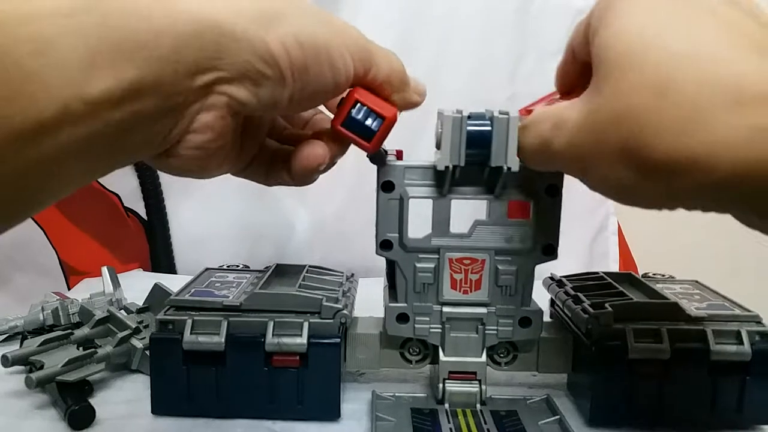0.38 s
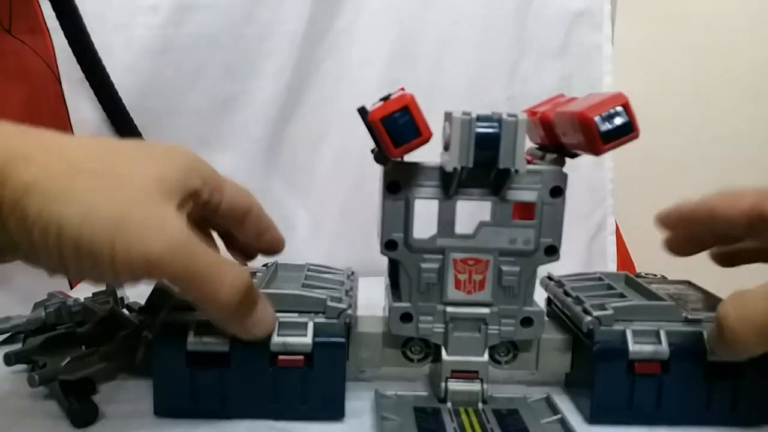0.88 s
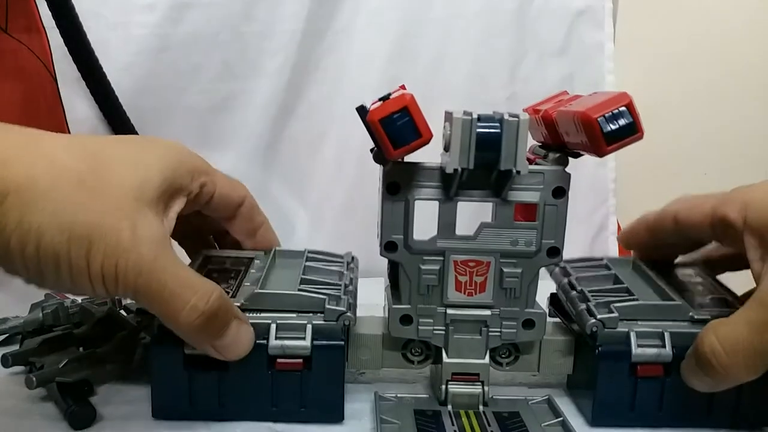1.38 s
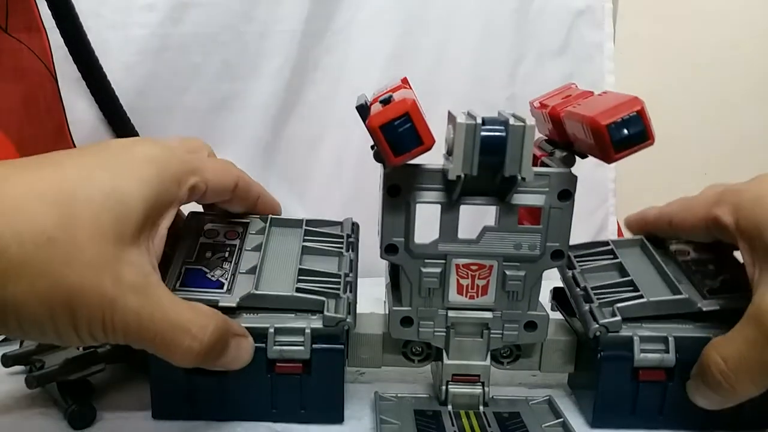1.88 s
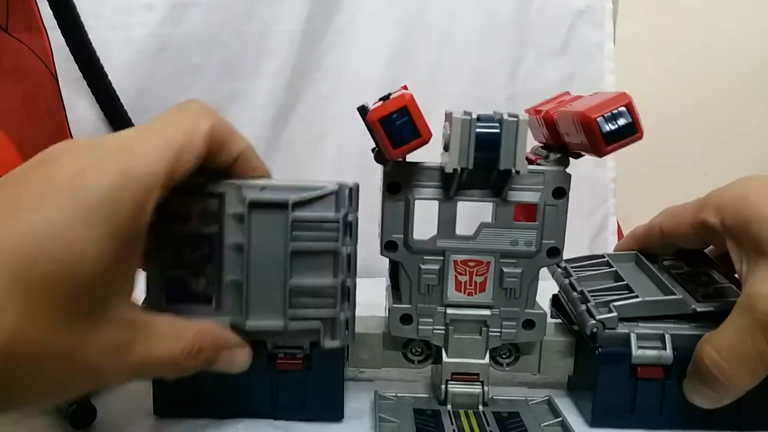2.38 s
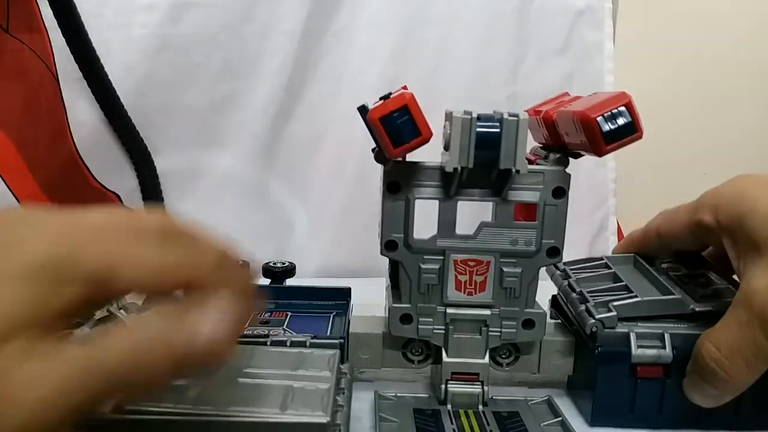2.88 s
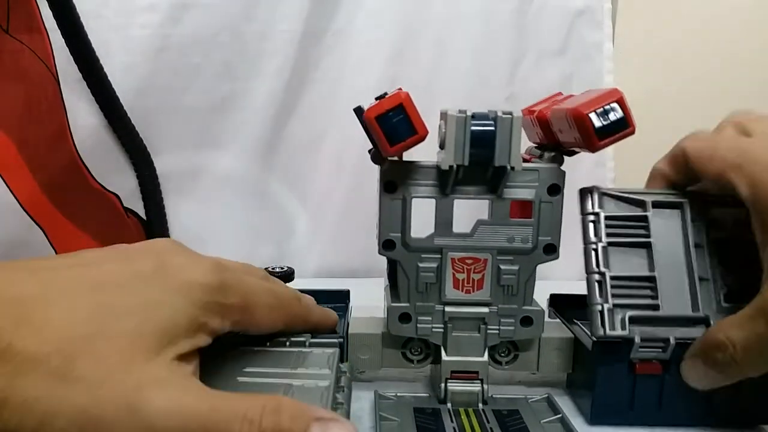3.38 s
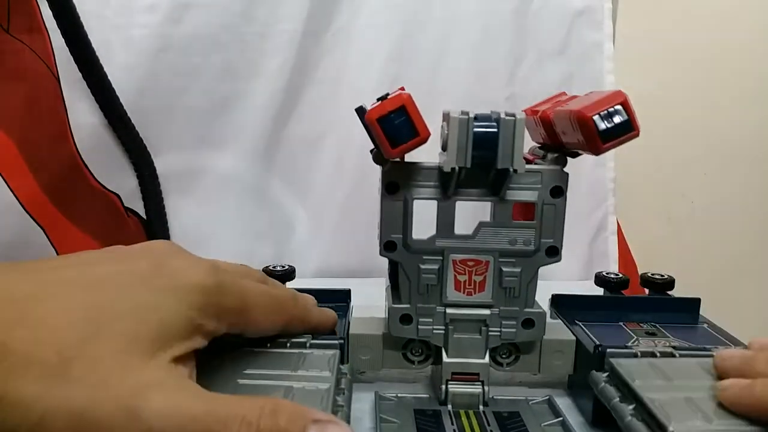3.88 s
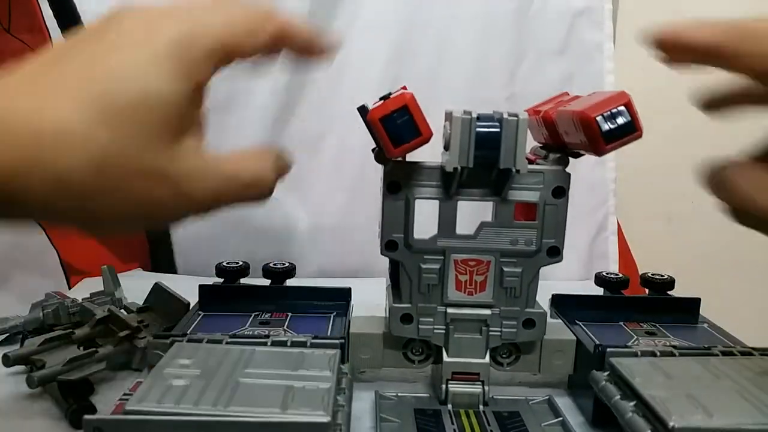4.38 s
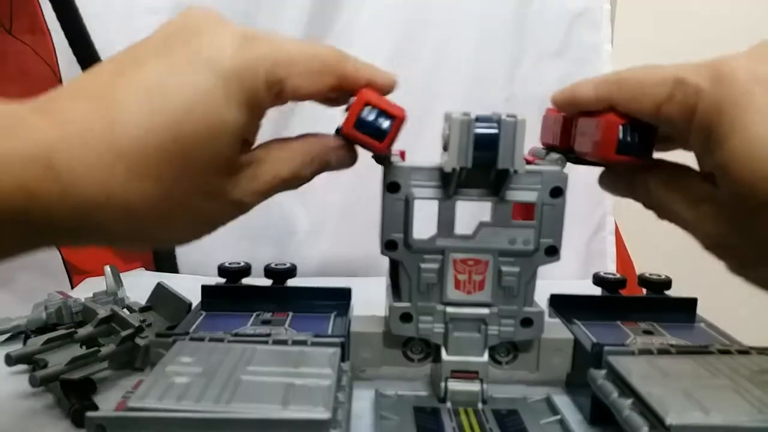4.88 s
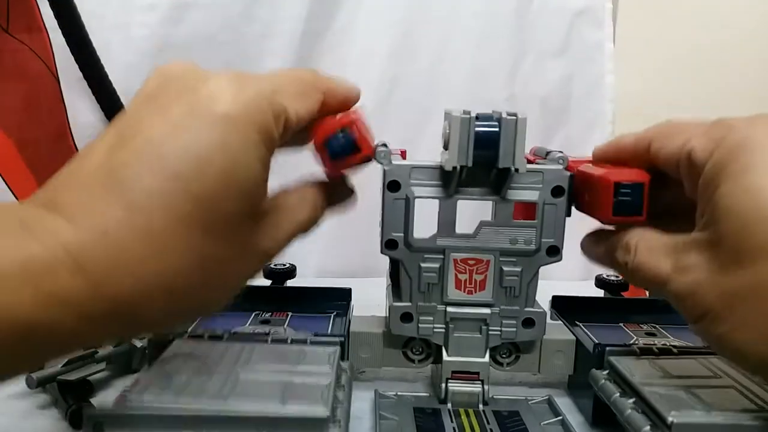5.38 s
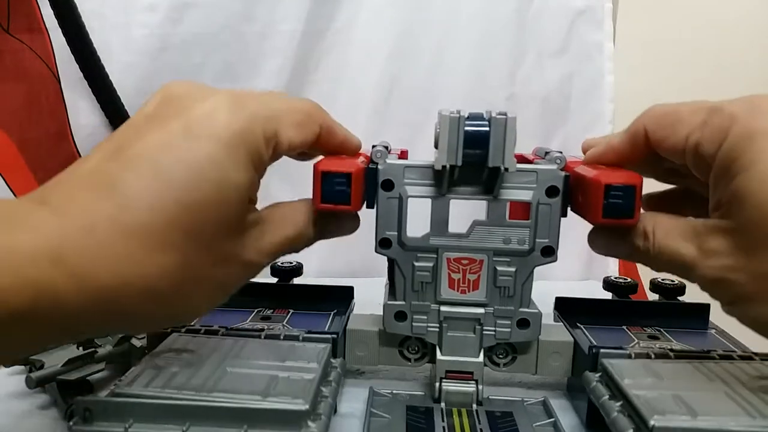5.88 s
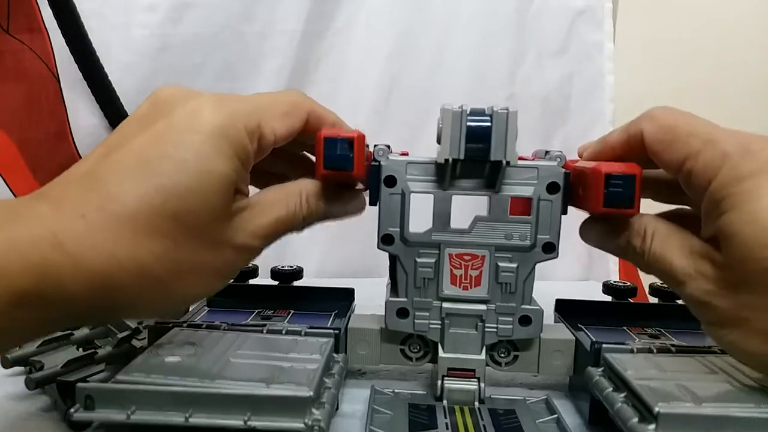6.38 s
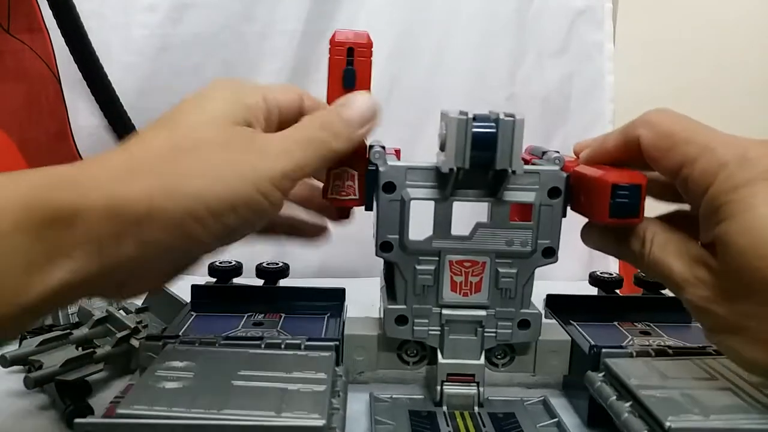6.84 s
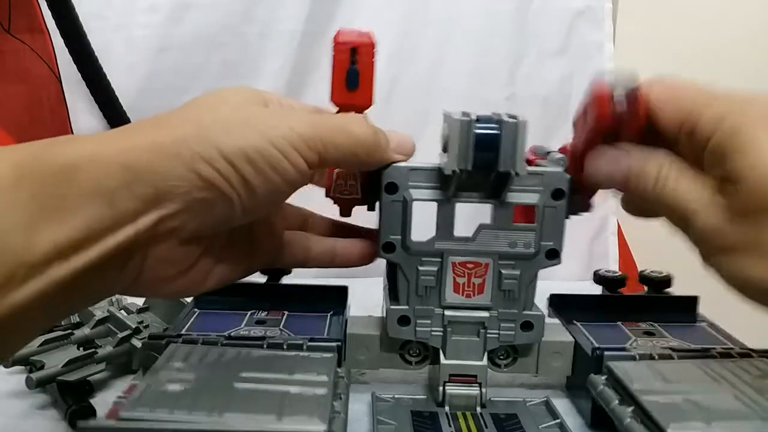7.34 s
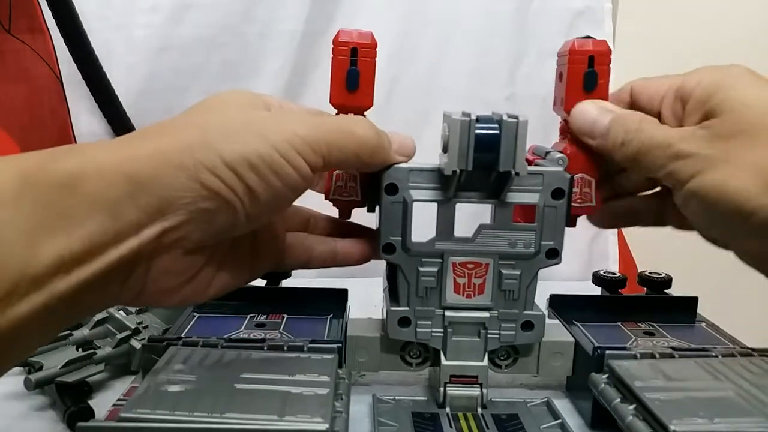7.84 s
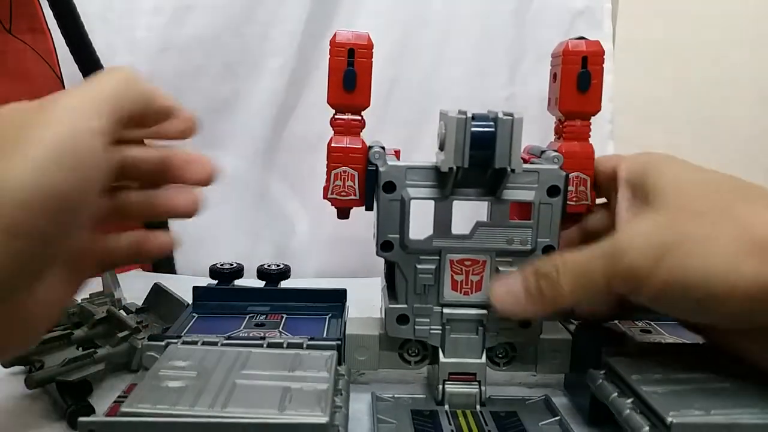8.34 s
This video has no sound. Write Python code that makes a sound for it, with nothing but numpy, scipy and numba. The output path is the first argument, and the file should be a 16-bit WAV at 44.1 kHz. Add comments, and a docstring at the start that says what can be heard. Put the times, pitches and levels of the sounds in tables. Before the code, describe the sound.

Irregular dry plastic clicks and rattles, a few strong clacks thumping the table, faint hand rustle, and a quick ratcheting joint at the end.

```python
"""A faint rustle of hands and a few light clicks come first, then hands fold a hard plastic toy on a table,
close to a phone in a quiet room: joints click, lids clack and rattle, a tight joint squeaks briefly.
A ratchet joint ticks at the end. Each contact is a short force that sets groups of ringing tones going.
The table thumps under the big blows: a soft push and a decaying low tone. Filtered noise makes the skin hiss
and the far town rumble; wavering low tones make the drones."""
import sys
import numpy as np
from scipy import signal
from scipy.fft import rfft, irfft
from scipy.io import wavfile
from scipy.ndimage import uniform_filter1d
from numba import njit

SR = 44100
rng = np.random.default_rng(int(sys.argv[2]) if len(sys.argv) > 2 else 0)


def file_out(sig):
    """Save sig as 16-bit WAV at sys.argv[1]."""
    # one column per channel
    cols = np.atleast_2d(sig).T
    # limit, then scale
    lim = np.clip(cols, -1, 1)
    pcm = np.round(lim * 32767).astype(np.int16)
    wavfile.write(sys.argv[1], SR, pcm)


def magnitude_from_level(level_db):
    """Linear magnitude for a level in decibels (20 dB per decade)."""
    exponent = np.asarray(level_db, float) / 20
    return 10 ** exponent


N = 373968
T = np.arange(N) / SR
CLUSTER = 3  # close tones that stand for each listed ringing tone


def set_rms(x, db):
    """Scale a sound to an rms level in dB."""
    return x * magnitude_from_level(db) / np.sqrt(np.mean(x ** 2))


def bandpass(x, order, band_hz):
    """Keep only the sound between two frequencies."""
    return signal.sosfilt(signal.butter(order, band_hz, "bandpass", fs=SR, output="sos"), x)


def coloured(points):
    """Noise with the given spectrum, rms 1."""
    hz, db = np.transpose(points)
    grid_hz = np.maximum(np.fft.rfftfreq(N, 1 / SR), 1)
    gain = magnitude_from_level(np.interp(np.log(grid_hz), np.log(hz), db))
    return set_rms(irfft(rfft(rng.standard_normal(N)) * gain, N), 0)


def walk(rate_hz):
    """Random levels, rate_hz of them a second, with smooth slides between; spread a little under 1."""
    hold = int(SR / rate_hz)
    steps = np.repeat(rng.standard_normal(N // hold + 1), hold)
    return uniform_filter1d(steps, hold)[:N]


def fades(start_s, db, decay_s):
    """An envelope that jumps at each event and dies away; a bare spike if the decay is zero."""
    spikes = np.zeros(N)
    places = np.minimum((np.asarray(start_s) * SR).astype(int), N - 1)
    np.add.at(spikes, places, magnitude_from_level(db))
    return signal.lfilter([1], [1, -np.exp(-1 / (max(decay_s, 1e-9) * SR))], spikes)


def grit(per_s, spread_db):
    """Sparse tiny impacts of very uneven size, rms 1."""
    hit = rng.random(N) < per_s / SR
    size = magnitude_from_level(spread_db * rng.exponential(size=N))
    return set_rms(hit * rng.standard_normal(N) * size, 0)


@njit
def resonate(force, poles, gains, struck):
    """A bank of ringing tones (modes) whose pitch and weight depend on the spot last struck."""
    out = np.zeros(len(force))
    for k in range(poles.shape[1]):
        z = 0j
        for i in range(len(force)):
            z = z * poles[struck[i], k] + gains[struck[i], k] * force[i] + 1e-18
            out[i] += z.imag
    return out


def ring(force, modes, struck, scatter_db, detune, band_hz, tilt_db=0, turns=0.21):
    """A force rings clusters of modes; grip and contact point retune and reweight them, in the part's own band."""
    hz, db, t60_s = np.repeat(np.transpose(modes), CLUSTER, axis=1)
    chance = rng.standard_normal((struck.max() + 1, 3, len(hz)))
    hz = np.minimum(hz * np.exp(detune * chance[:, 0]), .45 * SR)
    decay = np.log(1000) / np.maximum(t60_s, .002)
    poles = np.exp((2j * np.pi * hz - decay) / SR)
    gains = magnitude_from_level(db + tilt_db + scatter_db * chance[:, 1])
    gains /= np.sqrt(np.sum(gains ** 2, axis=1, keepdims=True) / 2)
    # neighbouring clusters swing in opposite senses
    sense = (-1) ** np.repeat(np.arange(len(modes)), CLUSTER)
    # each mode radiates from another part, so its phase strays
    phase = np.exp(2j * np.pi * turns * chance[:, 2])
    rung = resonate(force, poles, gains * sense * phase, struck)
    return bandpass(rung, 2, np.minimum(band_hz, .45 * SR))


# a far engine drone, one row per swell: start_s (its loudest moment), length_s (time to fall to 1/e),
# pitch_hz, level_db (rms at the loudest, before wavering)
SWELLS = [(0.45, 0.41, 80, -51.5), (1.2, 0.37, 78.7, -63), (2.294, 0.26, 78, -62), (3.3, .3, 71.5, -65.5),
          (4.446, 0.18, 71, -65), (5.6, 0.63, 75, -68.5), (6.398, 0.44, 79.7, -63.5),
          (7.491, 0.54, 80.7, -62.5), (8.3, 0.27, 80.2, -63)]


def swells():
    """The far engine drone: each swell rises and dies away on its own slightly wavering pitch."""
    wavering_time = np.cumsum(1 + 0.018 * walk(8)) / SR
    tone = 0
    for start_s, length_s, hz, db in SWELLS:
        swell = magnitude_from_level(db) * np.exp(-((T - start_s) / length_s) ** 2)
        tone = tone + swell * np.sin(2 * np.pi * hz * wavering_time)
    waver_db = 1.5 * walk(6)
    return np.sqrt(2) * magnitude_from_level(waver_db) * tone


def drone(rows):
    """A low tone that slides through the rows (start_s, pitch_hz, level_db) and wavers in pitch and level."""
    start_s, hz, db = np.transpose(rows)
    wavering_hz = np.interp(T, start_s, hz) * (1 + 0.0141 * walk(8))
    phase = 2 * np.pi * np.cumsum(wavering_hz) / SR
    waver_db = 1.5 * walk(6)
    return np.sqrt(2) * magnitude_from_level(np.interp(T, start_s, db) + waver_db) * np.sin(phase)


# colour of the room air and town rumble: pitch_hz, relative level_db (per Hz)
AIR_COLOUR = [(12, -45), (20, -13), (94, -5.5), (195, -3), (314, -7.5), (372, -6.5), (670, -14), (863, -15),
              (939, -14), (1020, -17.5), (1210, -18.5), (1320, -23), (4410, -43.5), (15200, -62),
              (16500, -47)]
# a second drone that rises and fades: start_s, pitch_hz, level_db (rms before wavering)
HIGH_DRONE = [(1.8, 130.6, -89), (2.2, 127.2, -71), (3.6, 143.3, -64.5), (4.5, 142.5, -63.5),
              (5.5, 146, -72.5), (6.0, 154, -84)]
# narrow wavering hums of appliances: pitch_hz, width_hz, level_db (rms)
APPLIANCES = [(359, 30, -66), (3170, 30, -80.5)]


def air():
    """Room air with town rumble as coloured noise, drones, and appliance hums as sharply filtered noise."""
    air_db, hum_hz, hum_db = -57, 53.6, -67
    hum = drone([(0, hum_hz, hum_db), (N / SR, hum_hz, hum_db)])
    for hz, width_hz, db in APPLIANCES:
        narrow = signal.iirpeak(hz, hz / width_hz, fs=SR)
        hum += set_rms(signal.lfilter(*narrow, rng.standard_normal(N)), db)
    return set_rms(coloured(AIR_COLOUR), air_db) + swells() + drone(HIGH_DRONE) + hum


# hands at work: start_s, movement level_db, skin sliding level_db (against the movement)
HANDS_MOVING = [(0.0, -60.5, -21), (0.47, -60, -19), (0.66, -72.5, -1), (0.99, -73.5, -6.5),
                (1.32, -70, -18), (1.58, -74.5, -11), (2.27, -68.5, -10), (2.34, -67, -7),
                (3.14, -74, -7.5), (3.26, -66, -2), (4.58, -70.5, -6), (5.36, -69.5, -11),
                (5.55, -56.5, -11), (5.72, -72.5, -1.5), (6.0, -68.5, -13), (6.12, -69, -14),
                (6.31, -84.5, -12), (6.54, -57, -7.5), (6.68, -60, -18), (6.82, -66, -6.5),
                (7.09, -75.5, -14), (7.22, -67, -9), (8.15, -59.5, -16.5), (8.24, -62.5, -8),
                (8.36, -61, -2), (8.48, -75, -1)]
# colour of the skin hiss: pitch_hz, relative level_db (per Hz)
SKIN_COLOUR = [(1760, -9), (3000, -14), (3620, -0.5), (3910, -3.5), (4630, -6), (6170, -13), (7350, -21.5),
               (10100, -9.5), (16000, -17)]
# ringing of the hollow shell (also used by the clicks): pitch_hz, relative level_db, t60_s (time to fall 60 dB)
SHELL_MODES = [(626, -14.5, 0.015), (788, -6, 0.052), (973, -0.5, 0.042), (1192, -1.5, 0.036),
               (1370, -3, 0.028), (1569, 0.5, 0.036), (1678, 0.5, 0.032), (1807, 0.5, 0.021),
               (2007, -7.5, 0.054), (2146, 2.5, 0.018), (2510, 0.5, 0.035)]
# ringing of the thin parts (also used by the clicks): pitch_hz, relative level_db, t60_s
THIN_MODES = [(2553, -2.5, 0.016), (2930, -2, 0.042), (3117, -17, 0.022), (3330, 0, 0.019),
              (4000, -4, 0.028), (4540, 1.5, 0.015), (4650, 1, 0.007), (5250, -4.5, 0.028),
              (5510, -7, 0.016), (5980, -0.5, 0.0039)]


def rustle():
    """Parts scrape in fine grit through the shell; skin hisses over the plastic."""
    start_s, move_db, skin_db = np.transpose(HANDS_MOVING)
    moving = magnitude_from_level(np.interp(T, start_s, move_db))
    skin = magnitude_from_level(np.interp(T, start_s, skin_db))
    hiss = coloured(SKIN_COLOUR) * magnitude_from_level(1.5 * walk(25) + 2.5 * walk(6))
    spot = (T * 40).astype(int)  # the scraping spot changes 40 times a second
    scrape = ring(grit(1800, 1.2), SHELL_MODES[3:] + THIN_MODES[:2], spot, 1.3, 0.071, (800, 4000))
    return moving * (set_rms(scrape, -3.0) + skin * set_rms(hiss, 0))


# blows that reach the table top: start_s, strength level_db (before filtering), share that rings the top (0-1)
BLOWS = [(2.238, -44.5, 0.86), (2.675, -47, 0.5), (2.709, -34.5, 0.75), (3.154, -50, 0.16),
         (3.325, -33, 0.12), (3.813, -40.5, 0.56), (3.869, -46, 0), (5.996, -45, 0.83), (6.502, -38, 0.8),
         (6.539, -40, 0.74), (7.399, -47, 0.8)]


def table():
    """A soft low push, part of which sets the table top ringing on one low tone."""
    top_hz, top_t60_s, top_rise_s = 170.5, 0.27, 0.0065
    start_s, blow_db, share = np.transpose(BLOWS)
    share = np.clip(share, .01, .99)
    push = bandpass(fades(start_s, blow_db + 20 * np.log10(1 - share), 0.00055), 1, [45, 700])
    age = T[:SR // 2]
    top = np.sin(2 * np.pi * top_hz * age) * np.exp(-np.log(1000) * age / top_t60_s)
    top *= 1 - np.exp(-age / top_rise_s)
    blows = np.zeros(N)
    blows[(start_s * SR).astype(int)] = magnitude_from_level(blow_db) * share
    return magnitude_from_level(21) * push + signal.fftconvolve(blows, top)[:N]


# a joint squeaks: start_s (its loudest moment), length_s (time to fall to 1/e), pitch_hz,
# level_db (peak before roughening)
SQUEAK_ROWS = [(6.49, 0.01, 4600, -63), (6.694, 0.0072, 4650, -51)]


def squeaks():
    """Short whistles of a tight joint, made rough by fast random changes of level."""
    rough = magnitude_from_level(5 * walk(900))
    whistle = 0
    for start_s, length_s, hz, db in SQUEAK_ROWS:
        swell = magnitude_from_level(db) * np.exp(-((T - start_s) / length_s) ** 2)
        whistle = whistle + swell * np.sin(2 * np.pi * hz * T)
    return rough * whistle


# teeth of a ratchet joint: start_s, snap level_db (before the drive offsets), edge tick level_db (against the snap)
RATCHET_TEETH = [(8.0533, -17.5, -27), (8.082, -12.5, -22.5), (8.1138, -23.5, -26), (8.1431, -18, -18),
                 (8.2556, -22, -33), (8.2848, -12.5, -20), (8.315, -18, -22), (8.3439, -18, -20),
                 (8.3727, -33, -29), (8.4001, -20.5, -27)]
# ringing of the ratchet arm: pitch_hz, relative level_db, t60_s
ARM_MODES = [(2350, -12, .007), (2880, -5, .016), (3150, -3, .008), (3510, -2.5, .028), (3800, -1, .006),
             (4370, -2, .007), (4850, -3, .007), (5380, -3, .006), (6000, -4, .005), (6600, -6, .005),
             (7200, -11, .005)]
# ringing of the hard edges (also used by the clicks): pitch_hz, relative level_db, t60_s (ring() allows 0.002 at least)
EDGE_MODES = [(7045, 8, 0.0066), (7500, -8, 0.0025), (8150, -42, 0.003), (9990, 7, 0.0037),
              (10210, 5.5, 0.0093), (11500, -8, 0.0015), (14000, -28.5, 0.0018), (14500, 15, .003)]


def ratchet():
    """A springy tooth snaps over, always on the same spot: one sharp tick into the arm, then a brief shiver."""
    start_s, snap_db, edge_db = np.transpose(RATCHET_TEETH)
    tick_db = snap_db + edge_db
    same_spot, shiver = np.zeros(N, int), rng.standard_normal(N)
    arm = fades(start_s, snap_db - 7.5, 0) + shiver * fades(start_s, snap_db - 28.5, 0.0047)
    tick = fades(start_s, tick_db + 4.0, 0) + shiver * fades(start_s, tick_db - 22.0, 0.011)
    body = ring(arm, ARM_MODES, same_spot, .5, .012, (2200, 12000), turns=.04)
    edge = ring(tick, EDGE_MODES[:6], same_spot, .5, .04, (6000, 13000), turns=.05)
    return body + edge


# plastic against plastic: start_s, hit level_db (before the drive offsets), thin parts level_db and
# edge tick level_db (both against the hit), loose rattle level_db (against the drive of each part)
CONTACTS = [(0.015, -57.5, -20, -4, -13), (0.048, -58.5, -15, -28, -12), (0.081, -51, -12, -23, -26),
            (0.119, -33.5, -13, -17, -9.5), (0.128, -25.5, -11, -24, -23), (0.153, -46, -11, -12, -24),
            (0.248, -34, -7, -18, -13), (0.259, -53.5, -24, -31, 1), (0.348, -49, -13, -16, -19),
            (0.367, -25, -7, -15, -12.5), (0.38, -45, -10, -16, -31), (0.398, -44, -14, -14, -22),
            (0.405, -34, -13, -7.5, -13.5), (0.415, -31.5, -11, -11, -22), (0.452, -43, -17, -33, -6),
            (0.495, -39, -6, -5, -28), (0.511, -28.5, -8, -10, -16.5), (0.531, -36, -19, -34, -16.5),
            (0.549, -42, -13, -24, -19), (0.61, -39, -8, -16, -3.5), (0.95, -30.5, -18.5, -36, -21.5),
            (1.076, -40.5, -4.5, -22, -25), (1.138, -47, -23, -39, -7.5), (1.155, -37, -28, -52, -38),
            (1.208, -36.5, -43, -40, -34), (1.247, -48, -32, -39, -30), (1.315, -40, -28, -30, -28),
            (1.329, -28.5, -17.5, -19.5, -31), (1.361, -44, -26, -41, -33), (1.418, -40, -22, -31, -31),
            (1.454, -38.5, -20, -26, -21), (1.463, -51, -16, -18, -14), (1.48, -40, -23, -18, -17),
            (1.497, -30, -17.5, -7.5, -27), (1.801, -41.5, -10, -17, -33), (1.819, -27, -6, -7, -21),
            (1.866, -47, 1.5, -5, -23), (1.925, -43.5, -23, -26, -8), (1.962, -43.5, -13, -16, -13.5),
            (1.998, -44, -12, -22, -17), (2.024, -47, -23, -14, -10), (2.198, -58.5, -5, -11, -7.5),
            (2.239, -16.5, -6, -6.5, -23), (2.261, -23, -14, -23, -21), (2.302, -37.5, -22, -21, -11),
            (2.386, -41.5, -19, -8, -19), (2.414, -41.5, -3, -9, -30), (2.465, -41, -22, -26, -9.5),
            (2.498, -45.5, -8, -7, -16.5), (2.652, -43.5, -12, -3.5, -9), (2.673, -17.5, -8.5, -15, -19.5),
            (2.684, -20, -10.5, -16, -23.5), (2.705, -24, -4.5, -4, -34), (2.712, -20, -3, 1.5, -18.5),
            (2.74, -31, -21, -12, -18), (2.78, -39, -16, -15, -21), (2.873, -43.5, -1, -2, -22),
            (2.903, -49, -10, -1, -26), (2.945, -44.5, -6.5, -6, -29), (3.014, -44.5, -16, -24, -26),
            (3.095, -37, -3.5, -13, -24.5), (3.126, -28.5, 6, -1, -29), (3.153, -23.5, 0.5, 3, -24),
            (3.324, -12, -7.5, -3, -19), (3.341, -19.5, -4.5, -22, -23), (3.373, -35.5, -11, -1, -26),
            (3.399, -27.5, -11, -7.5, -31), (3.511, -47, -20, -18, -26), (3.575, -45, -18, -30, -24),
            (3.595, -52.5, -4, -8, -18), (3.789, -44, -26, -23, -25), (3.798, -27, -21, -24, -15),
            (3.813, -20.5, -1, 0, -19), (3.829, -13.5, -36, -18, -23), (3.858, -43, -9, -13, -25),
            (3.869, -18.5, -3.5, -18, -18), (3.903, -21, -24, -28, -16.5), (3.926, -30, -30, -40, -30),
            (3.976, -35.5, -10.5, -28, -22), (3.986, -45, -12, -21, -18), (4.14, -47, -16, -27.5, -25),
            (4.247, -41.5, -16, -24, -15), (4.657, -48, -7.5, -11, -25), (4.716, -41, -13, -29, -32),
            (4.729, -42, -21, -32, -17), (4.748, -44, -6, -32, -17), (4.856, -46, -15, -36, -34.5),
            (4.964, -31.5, -15, -26, -22), (5.077, -34.5, -12, -21, -17.5), (5.171, -38.5, -6.5, -11, -9),
            (5.182, -25, -6, -24, -32), (5.358, -47, 9, 6, -21), (5.438, -38, -7.5, -18, -10),
            (5.455, -36, -13, -3, -20), (5.494, -43, -11, -17, -25), (5.511, -44, -2, -7, -28),
            (5.545, -47, 7.5, 9, -20), (5.58, -36.5, -4.5, -9, -18), (5.61, -14.5, -10.5, -16, -18.5),
            (5.642, -39, 3, -19, -27), (5.661, -31, -8, -15, -27), (5.728, -54.5, 0, -8, -19),
            (5.896, -41.5, -17.5, -29, -12.5), (5.933, -44.5, -16.5, -29, -24),
            (5.971, -34.5, -32, -31, -19), (6.007, -38.5, -2, -5, -17.5), (6.056, -39, -7, -10, -28),
            (6.098, -44, -12, -29, -14), (6.12, -42.5, -26, -30, -12), (6.222, -44.5, -14, -11.5, -19),
            (6.266, -39.5, -3, 0.5, -19.5), (6.321, -43, -3.5, -16, -23), (6.503, -31.5, -5.5, -6.5, -7),
            (6.513, -30.5, -4.5, -19, -19.5), (6.524, -24, -12, -31, -25), (6.543, -25.5, -12, -24, -16.5),
            (6.561, -32.5, -18, -13, -24), (6.674, -61, 6, 1, -17), (6.712, -50.5, -9, -21, -7),
            (6.735, -39, -6, -6, -3), (6.751, -23, -5.5, -13, -18.5), (6.774, -28.5, -20, -24, -20.5),
            (6.782, -32.5, -17, -6, -24), (7, -48, -22, -33, -22), (7.026, -46.5, -25, -34, -11.5),
            (7.055, -50, -15, -21, -12), (7.073, -41.5, -10, -15, -17), (7.088, -50.5, -2.5, -6, -24),
            (7.107, -42.5, -9, -6, -25), (7.115, -34, -21, -27, -26), (7.149, -47.5, -12, -10, -24),
            (7.163, -45, -11, -7, -24), (7.179, -45.5, -13, -2.5, -22), (7.197, -48, -22, -16, -30),
            (7.214, -50, -16, -6, -21), (7.231, -49.5, -11, -3, -28), (7.278, -44, 1, 5, -27),
            (7.314, -41.5, -0.5, 1, -21.5), (7.395, -42, -4, -10, -16), (7.41, -42.5, -8, -8, -15),
            (7.423, -34.5, -15, -39, -17), (7.438, -45, -7, -33, -15), (7.505, -33.5, -6.5, -9, -23),
            (7.533, -42, -17, -24, -10), (7.629, -39, -11.5, -11, -20.5), (7.739, -42, -9, -19, -18.5),
            (7.773, -35.5, -12.5, -22, -15), (7.805, -43, 1.5, -0.5, -28), (7.821, -39, -13, -20, -19),
            (7.829, -34, -13.5, -23, -21.5), (7.872, -42, -21, -33, -31), (7.883, -43, -26, -29, -16),
            (7.938, -41, -32, -35, -18), (7.988, -50, -22, -29, -10), (8.027, -36, -32, -34, -14)]


def clicks():
    """Each click is one hard contact that rings shell, thin parts and edges; loose parts chatter on after it."""
    shell_db, thin_drive_db, edge_drive_db = -8.5, -2, -0.5
    shell_hz, spot_spread = 1677, 0.048  # the shell's strongest ring shifts with the spot struck
    crack_db, crack_s = 1.5, 0.0019  # the many small modes that die at once blur into a dry crack
    start_s, hit_db, thin_db, edge_db, rattle_db = np.transpose(CONTACTS)
    # the ringing moves to a new spot just before each contact
    struck = np.maximum(np.searchsorted(start_s, T + 0.00023) - 1, 0)
    chatter = .33 * grit(9000, 1.5)
    scuff = np.sign(rng.standard_normal(N))  # the edges grind for a moment before they part
    # shell modes far from the spot's own ring are driven less
    spot_hz = shell_hz * np.exp(spot_spread * rng.standard_normal((len(start_s), 1)))
    octaves = np.log2(np.repeat(np.transpose(SHELL_MODES)[0], CLUSTER) / spot_hz)
    # modes, drive level_db, detune (spread of log pitch), radiated band_hz, weighting level_db
    parts = ((SHELL_MODES, shell_db, .022, (450, 3200), -10 * np.abs(octaves)),
             (THIN_MODES, thin_drive_db + thin_db, .05, (2000, 8000), 0),
             (EDGE_MODES, edge_drive_db + edge_db, .06, (5500, 14500), 0))
    out = 0
    for modes, drive_db, detune, band_hz, tilt_db in parts:
        db = hit_db + drive_db
        force = fades(start_s, db, 0)
        force = force + scuff * fades(start_s, db - 15.0, 0.001)
        force = force + chatter * fades(start_s, db + rattle_db, 0.02)
        crack_fade = fades(start_s, db + crack_db, crack_s)
        rattle_fade = fades(start_s, db + crack_db + rattle_db, 0.018)
        crack = bandpass(rng.standard_normal(N) * (crack_fade + rattle_fade), 2, band_hz)
        out = out + ring(force, modes, struck, 1.5, detune, band_hz, tilt_db) + crack
    return out


# how long the room rings in each band: pitch_hz (band centre), t60_s
ROOM_DECAY = [(300, 0.098), (800, 0.19), (2000, 0.2), (5500, 0.18), (12000, 0.093)]


def room(x):
    """A small furnished room: a dense tail of fading noise, band by band, shortest in the top treble."""
    room_db, rise_s = -14, 0.0048
    age = T[:SR // 2]
    tail = 0
    for hz, t60_s in ROOM_DECAY:
        band = bandpass(rng.standard_normal(len(age)), 2, [hz / 1.6, min(hz * 1.6, .45 * SR)])
        tail = tail + band * np.exp(-np.log(1000) * age / t60_s)
    tail *= 1 - np.exp(-age / rise_s)
    return magnitude_from_level(room_db) * signal.fftconvolve(x, tail / np.sqrt(np.sum(tail ** 2)))[:N]


def scene():
    """The toy, its echo in the room, the table, the hands, and the air around them."""
    toy = clicks() + ratchet() + squeaks()
    return (toy + room(toy) + table() + rustle() + air())[None]


def band_limit(x):
    """A steep low-pass at the top of the band."""
    return signal.sosfilt(signal.butter(12, 17030, fs=SR, output="sos"), x)


def record(dry):
    """The phone cuts the top treble with a steep low-pass filter."""
    top_hz = 16300
    finished = signal.sosfilt(signal.ellip(8, .2, 60, top_hz, fs=SR, output="sos"), dry)
    return band_limit(finished)


dry = scene()
out = record(dry)
file_out(out)
```